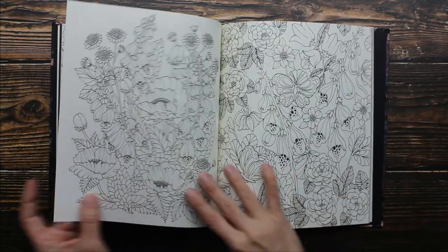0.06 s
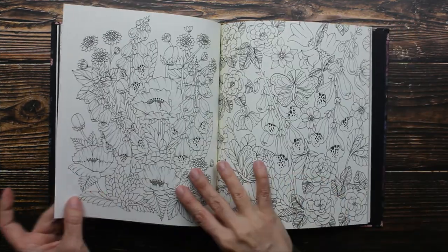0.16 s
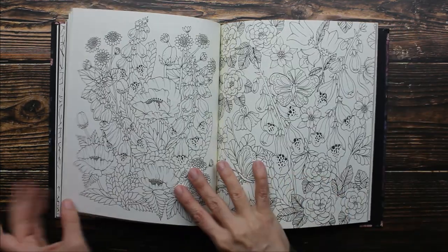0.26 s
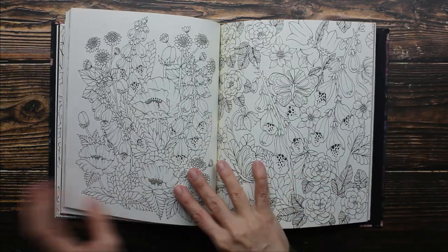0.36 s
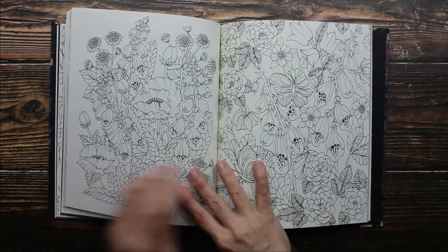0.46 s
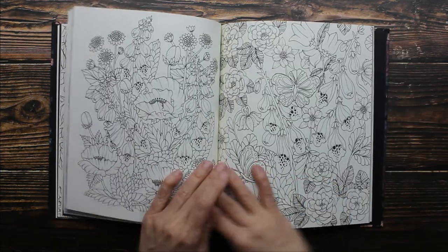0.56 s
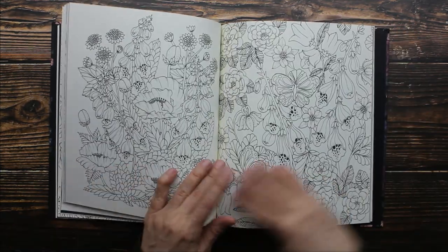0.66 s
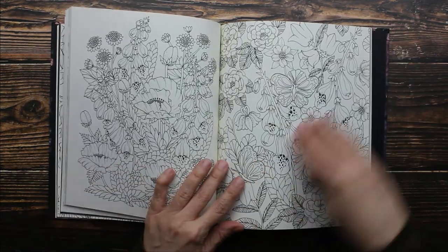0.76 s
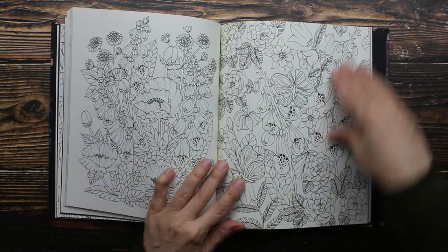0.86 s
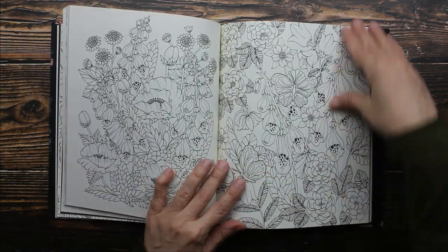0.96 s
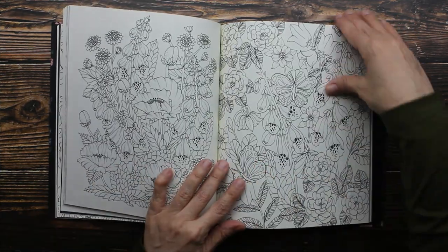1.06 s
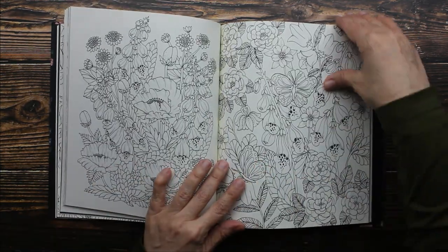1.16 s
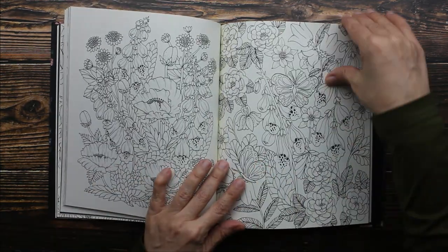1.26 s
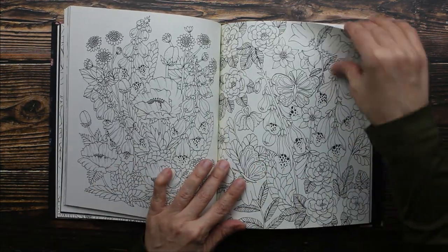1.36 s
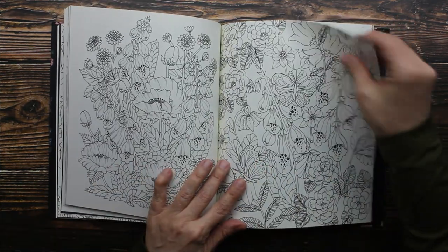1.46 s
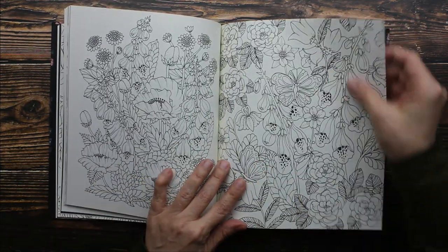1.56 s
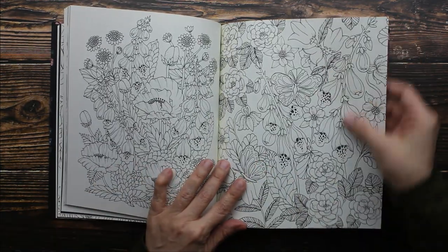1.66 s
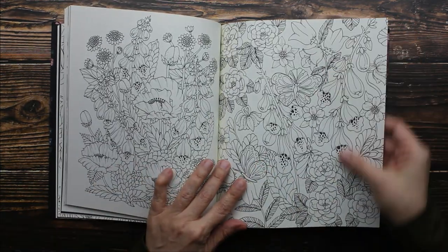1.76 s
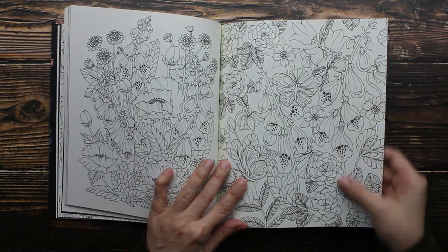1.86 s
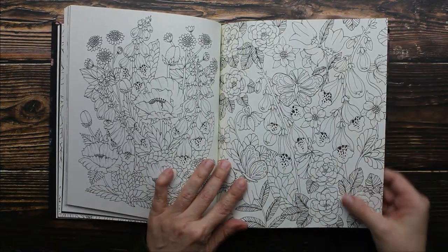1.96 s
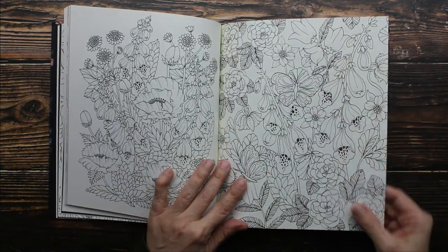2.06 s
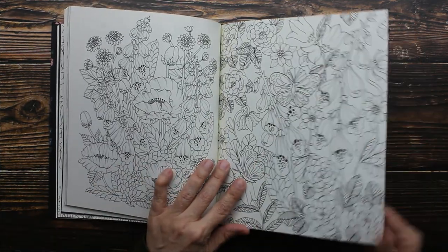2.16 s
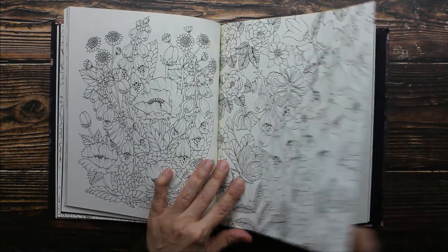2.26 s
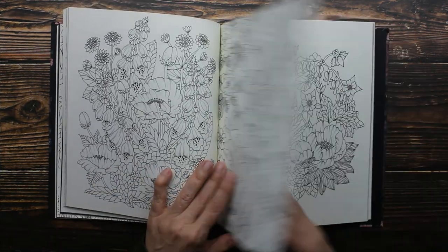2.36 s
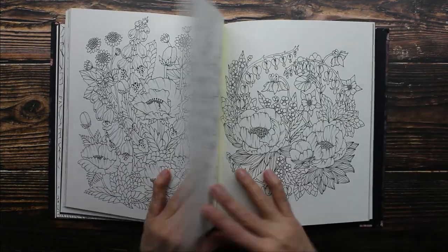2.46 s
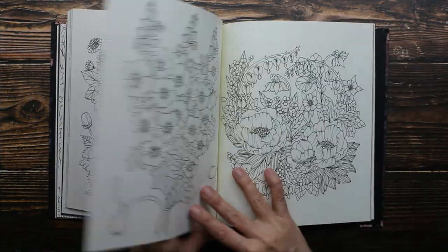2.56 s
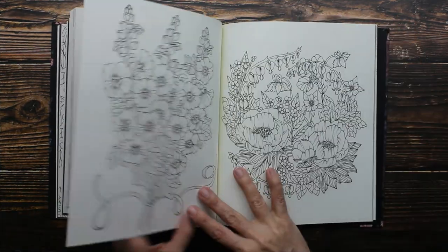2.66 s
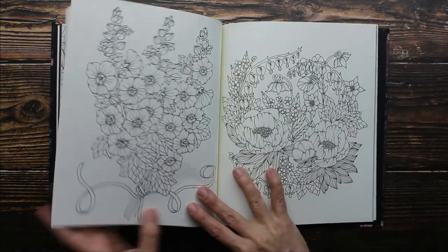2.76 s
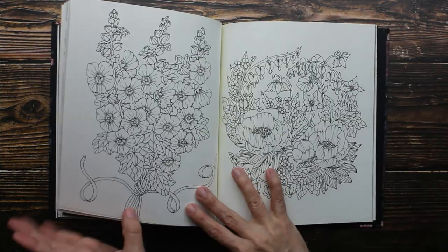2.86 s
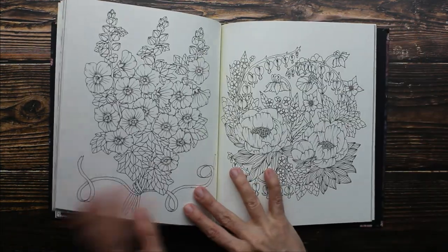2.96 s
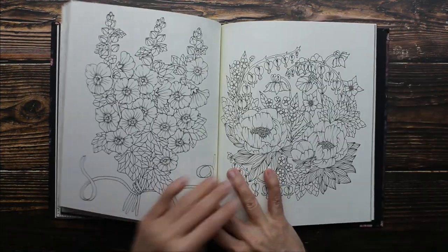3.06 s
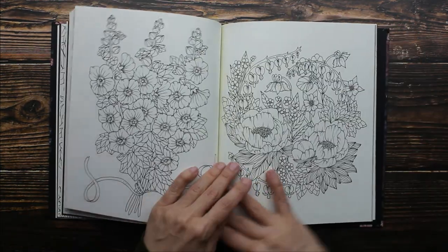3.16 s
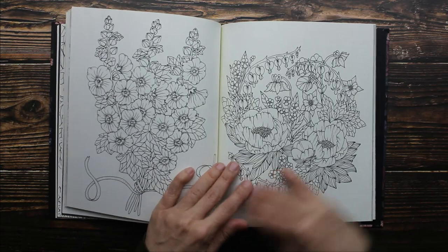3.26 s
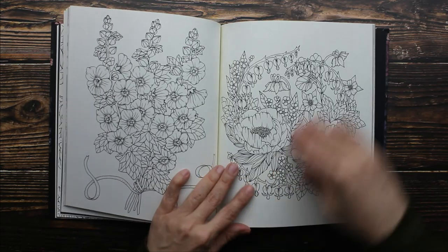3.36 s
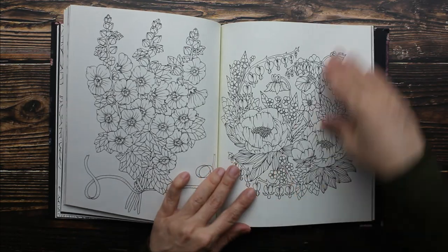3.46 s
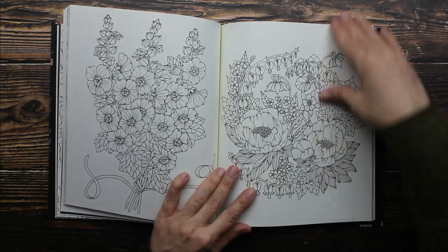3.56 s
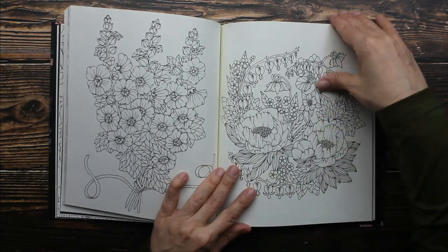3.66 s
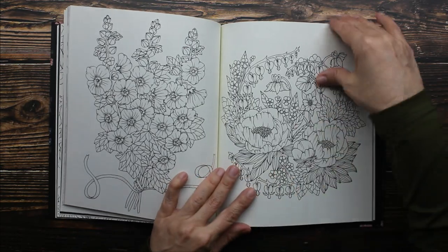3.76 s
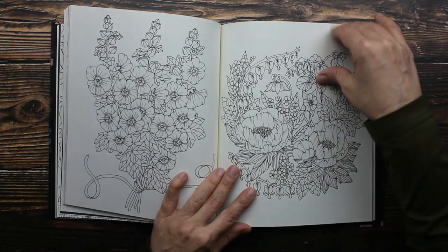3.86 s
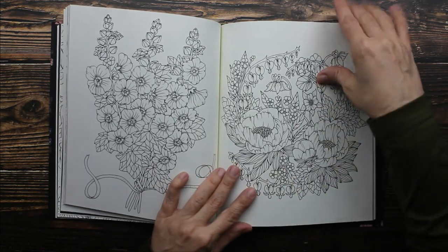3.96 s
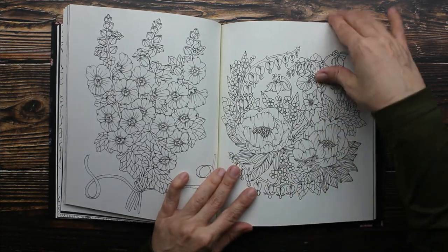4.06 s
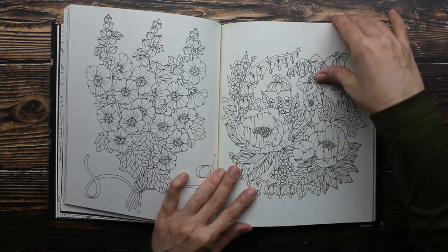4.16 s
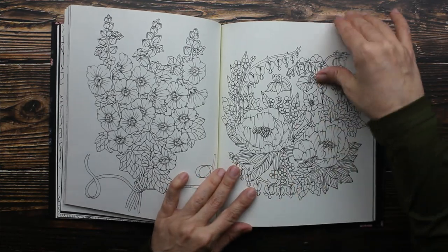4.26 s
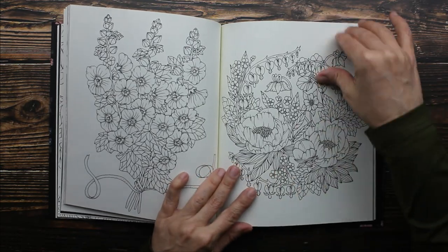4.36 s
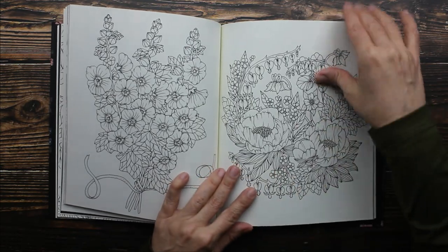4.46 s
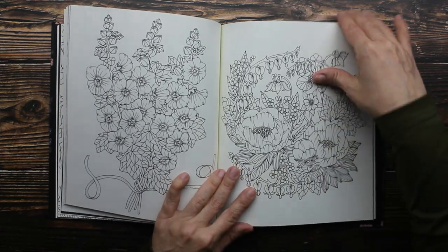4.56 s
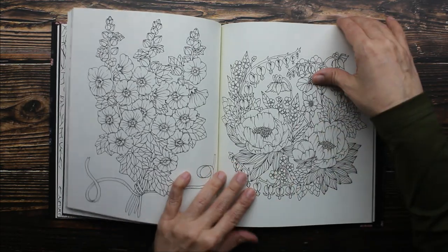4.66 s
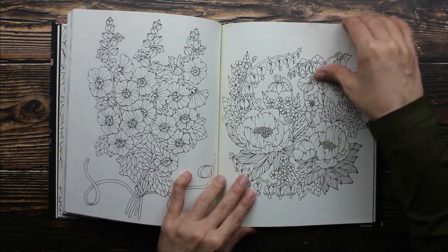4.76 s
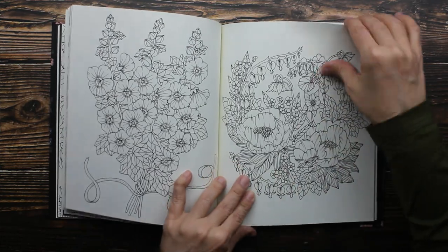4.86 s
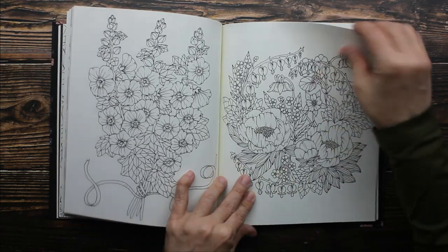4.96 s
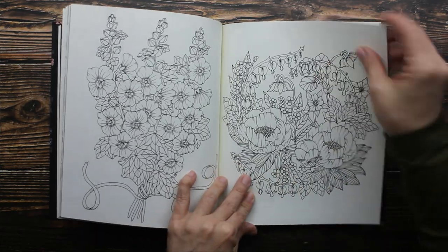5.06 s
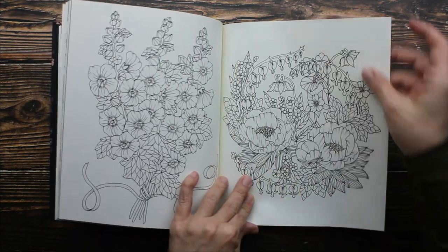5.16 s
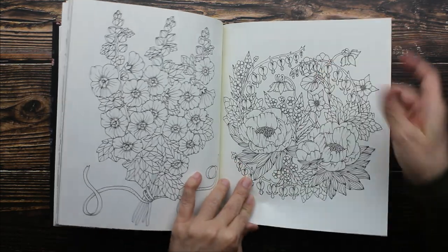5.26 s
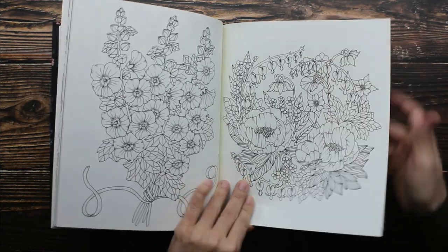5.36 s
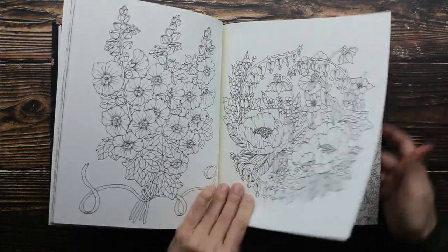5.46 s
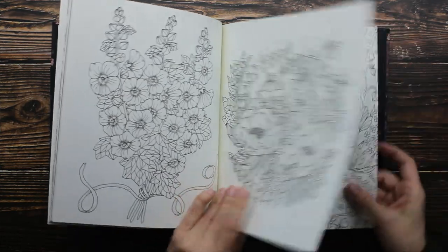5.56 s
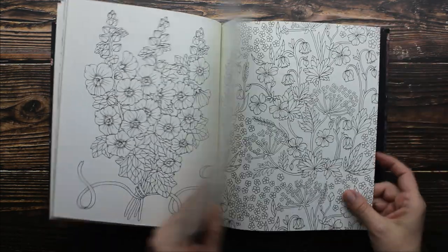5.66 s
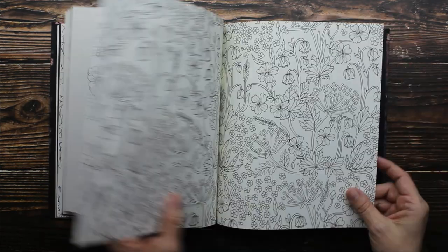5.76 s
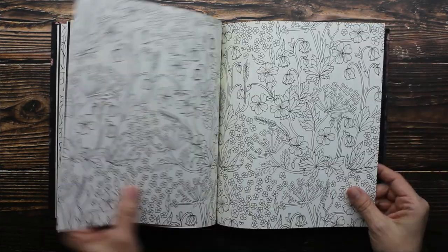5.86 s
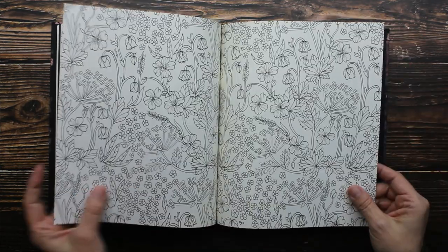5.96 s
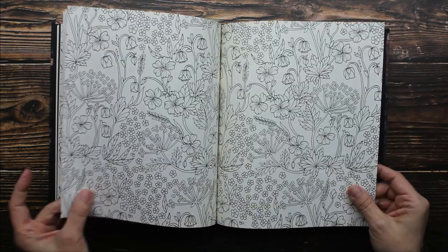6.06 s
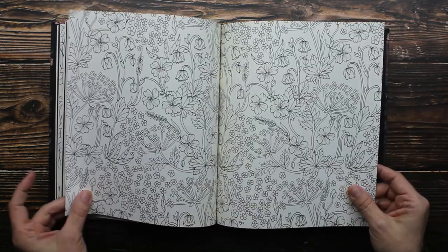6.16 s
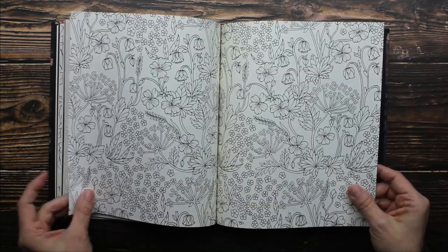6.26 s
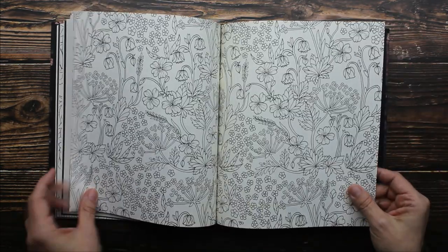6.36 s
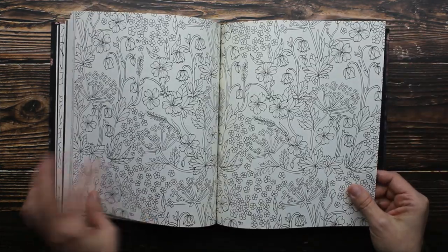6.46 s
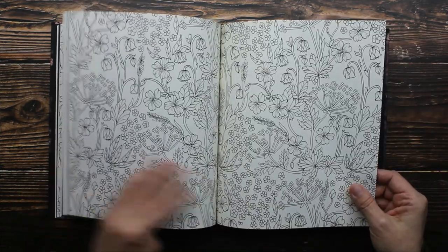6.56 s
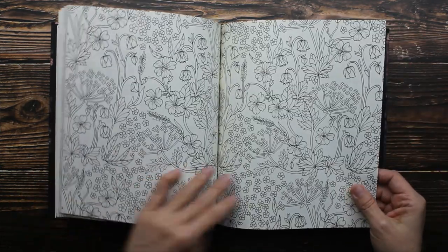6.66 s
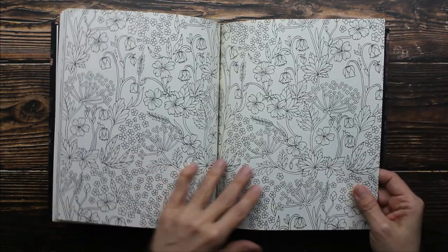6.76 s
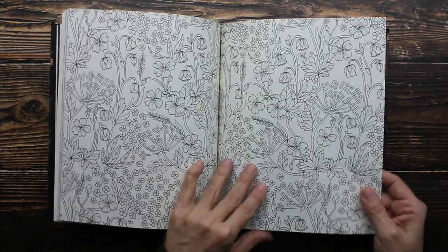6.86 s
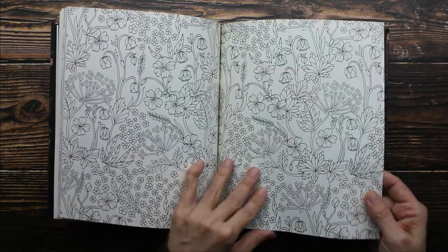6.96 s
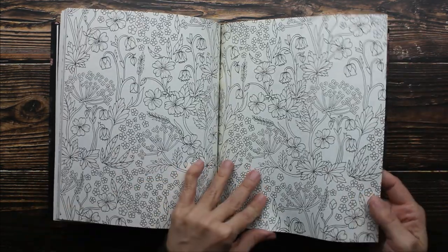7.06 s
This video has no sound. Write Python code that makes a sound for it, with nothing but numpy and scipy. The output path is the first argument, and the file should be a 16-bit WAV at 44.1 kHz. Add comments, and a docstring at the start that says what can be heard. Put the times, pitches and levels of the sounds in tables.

```python
"""Fingers and page edges slide over paper in strokes and pauses throughout: coloured noise in moving bands.
Thick pages of a book on a wooden table are turned by hand in a quiet room. Sheets flex, buckle and snap,
fingertips tap the page and the book knocks dully on the table: damped modes struck by short pushes.
Page edges tick (bursts of grit), taut sheets whistle (gliding narrow noise), a low room hum lies under all.
One microphone."""
import sys
import numpy as np
from scipy import signal
from scipy.io import wavfile

SR = 44100
rng = np.random.default_rng(int(sys.argv[2]) if len(sys.argv) > 2 else 0)


def amplitude_ratio(level_db):
    """Convert a level in decibels to the matching linear amplitude (field) ratio."""
    exponent = np.asarray(level_db, float) / 20
    return 10 ** exponent


def bounce(signal):
    """Save signal as a 16-bit WAV file at the path given by the first command-line argument."""
    frames = np.transpose(np.atleast_2d(signal))
    limited = np.clip(frames, -1, 1)
    pcm = np.round(limited * 32767).astype(np.int16)
    wavfile.write(sys.argv[1], SR, pcm)


N = 313110
STEP = 32  # samples between values of a slow curve
RUN_IN = 8192  # samples for filters to settle, then cut off
BAND_EDGES_HZ = 20 * 2 ** np.arange(0, 9.8, 0.25)
BAND_CENTRES_HZ = np.sqrt(BAND_EDGES_HZ[1:] * BAND_EDGES_HZ[:-1])[:, None]


def rms_one(x):
    """Scale to rms 1."""
    return x / np.sqrt(np.mean(x ** 2) + 1e-20)


def band(x, low_hz, high_hz):
    """Butterworth band-pass."""
    sos = signal.butter(2, [low_hz, min(high_hz, SR * 0.45)], "band", fs=SR, output="sos")
    return signal.sosfilt(sos, x)


def lowpass(x, order, top_hz):
    """Butterworth low-pass."""
    return signal.sosfilt(signal.butter(order, top_hz, fs=SR, output="sos"), x)


def resonance(x, hz, width_hz):
    """Two-pole resonance with gain 1 on top."""
    r = np.exp(-np.pi * width_hz / SR)
    poles = [1, -2 * r * np.cos(2 * np.pi * hz / SR), r * r]
    return signal.lfilter([(1 - r * r) / 2, 0, (r * r - 1) / 2], poles, x)


def ring(x, hz, t60_s):
    """A damped mode driven by x, scaled to peak 1."""
    r = amplitude_ratio(-60 / (t60_s * SR))
    y = signal.lfilter([1, -1], [1, -2 * r * np.cos(2 * np.pi * hz / SR), r * r], x)
    return y / np.abs(y).max()


def step_times():
    """Times in seconds of the slow-curve values."""
    return np.arange(0, N + STEP, STEP) / SR


def in_steps(rows):
    """Columns after the first, interpolated over time in the first."""
    s, *columns = np.transpose(rows)
    return [np.interp(step_times(), s, column) for column in columns]


def drift(rate_hz, count):
    """Rows of slow chance with spread 1, one value every STEP samples."""
    r = np.exp(-2 * np.pi * rate_hz * STEP / SR)
    chance = rng.standard_normal((count, N // STEP + 1002))
    slow = signal.lfilter([1], [1, -2 * r, r * r], chance)[:, 1000:]
    return rms_one(slow)[:, :len(step_times())]


def hump(level_db, centre_hz, widths_octaves):
    """Power per quarter-octave band of a broad resonance; widths below and above its centre."""
    octaves = np.log2(BAND_CENTRES_HZ / centre_hz) + 0 * level_db
    shape = np.exp(-0.5 * (octaves / np.where(octaves < 0, *widths_octaves)) ** 2)
    return amplitude_ratio(level_db) ** 2 * shape / shape.sum(axis=0)


def through_bands(power, drive):
    """Two unrelated drives dealt in turn to the bands, each band at its own moving power."""
    steps = np.arange(N) / STEP
    out = np.zeros(N)
    for k, (low_hz, high_hz) in enumerate(zip(BAND_EDGES_HZ, BAND_EDGES_HZ[1:])):
        gain = np.interp(steps, np.arange(power.shape[1]), np.sqrt(power[k]))
        out += gain * rms_one(band(drive[k % 2], low_hz, high_hz)[RUN_IN:])
    return out


# Air of the quiet room. Each row: frequency in Hz, relative density in dB per Hz.
ROOM_AIR = [(13, -34), (24, -7), (60, 3.5), (110, -9), (300, -12), (700, -19), (1500, -16), (3000, -15.5),
            (6000, -23), (9500, -24), (12500, -33), (15500, -47)]
# Low hum of the house. Each row: frequency in Hz, width in Hz, level in dB rms.
HOUSE_HUM = [(46.3, 9.1, -59), (133.9, 7.8, -71)]


def room_tone(level_db=-55, waver_db=3.0, waver_hz=1.3):
    """Distant air, almost steady, over two narrow hums."""
    hz, db = np.transpose(ROOM_AIR)
    density_db = np.interp(np.log(BAND_CENTRES_HZ), np.log(hz), db, left=-70, right=-90)
    power = BAND_CENTRES_HZ * amplitude_ratio(2 * density_db)
    moving_db = level_db + waver_db * drift(waver_hz, count=len(BAND_CENTRES_HZ))
    power = power / power.sum() * amplitude_ratio(2 * moving_db)
    white = rng.standard_normal((2, N + RUN_IN))
    air = through_bands(power, white)
    hum = np.zeros(N)
    for hz, width_hz, db in HOUSE_HUM:
        tone = resonance(resonance(white[0], hz, width_hz), hz, width_hz)
        hum += amplitude_ratio(db) * rms_one(tone[RUN_IN:])
    return air + hum


def walls(x, t60_s=0.36, echo_db=-19, low_hz=230, dull_hz=5000, gap_s=0.004):
    """The room answers with a short, dull, dying wash."""
    t = np.arange(round(0.4 * SR)) / SR
    wash = band(rng.standard_normal(len(t)), low_hz, dull_hz) * amplitude_ratio(-60 * t / t60_s) * (t > gap_s)
    return amplitude_ratio(echo_db) * signal.fftconvolve(x, wash / np.sqrt(np.sum(wash ** 2)))[:N]


# Dull knocks of book on table. Each row: start in seconds, peak of the lower mode in dB, its frequency in Hz.
TABLE_KNOCKS = [(0.78, -40, 86), (2.318, -51, 151), (2.482, -55, 210), (2.714, -59, 244), (3.15, -38.5, 68),
                (3.459, -52, 204), (4.635, -49, 136), (4.995, -40, 240), (5.874, -58, 237),
                (6.554, -46, 149), (6.609, -38, 140)]


def knocks(contact_s=0.0092, t60_s=0.16, partner_ratio=1.55, partner_db=-6):
    """A soft push sets two low modes of book and table top ringing."""
    size = 16384
    out, t = np.zeros(N + size), np.arange(size) / SR
    force = np.sin(np.pi * np.minimum(t / contact_s, 1)) ** 2
    for s, db, hz in TABLE_KNOCKS:
        at = round(s * SR)
        lower = ring(force, hz, t60_s)
        partner = amplitude_ratio(partner_db) * ring(force, partner_ratio * hz, 0.42 * t60_s)
        out[at:at + size] += amplitude_ratio(db) * (lower + partner)
    return out[:N]


# Page edges flicking free. Each row: start in seconds, nominal peak in dB, centre in Hz.
EDGE_TICKS = [(1.4637, -30, 3100), (3.834, -25.5, 5960), (3.837, -29, 3180), (4.277, -41, 3620),
              (4.285, -27.5, 4860), (4.291, -25.5, 4370), (4.817, -44, 5840), (4.859, -42, 6100),
              (4.866, -26, 3200), (4.8715, -36, 3120), (4.893, -36, 3110), (4.987, -13.5, 5040),
              (4.9933, -20.5, 3230), (5.601, -31, 7300), (6.404, -22.5, 3170), (6.409, -28.5, 6000)]


def ticks(below=0.083, above=2.35, low_hz=490, top_hz=11000, rms_re_peak_db=-7, hold_s=0.0026, t60_s=0.016):
    """A few milliseconds of broad grit that start at once and die fast."""
    size = 4096
    out, t = np.zeros(N + size), np.arange(size) / SR
    fade_db = -60 * np.maximum(t - hold_s, 0) / t60_s
    for s, db, hz in EDGE_TICKS:
        at = round(s * SR)
        grit = band(rng.standard_normal(size), below * hz, above * hz)
        grit = rms_one(band(grit, low_hz, top_hz))
        out[at:at + size] += grit * amplitude_ratio(db + rms_re_peak_db + fade_db)
    return out[:N]


# A taut sheet sliding. Each row: start in seconds, end in seconds, start in Hz, end in Hz,
# level in dB before the swell.
SHEET_WHISTLES = [(1.415, 1.492, 3920, 3930, -35.5), (1.429, 1.51, 7200, 7300, -40),
                  (1.56, 1.747, 2115, 2240, -43.5), (1.74, 1.92, 2420, 2700, -47),
                  (1.8, 2.104, 5400, 5780, -44.5), (2.24, 2.441, 2904, 2950, -47),
                  (2.62, 2.70, 5800, 5750, -41), (4.961, 5.039, 3390, 3300, -40),
                  (5.48, 5.528, 3800, 3830, -43), (5.528, 5.601, 2744, 2690, -45),
                  (5.537, 5.62, 7300, 7300, -42), (5.99, 6.153, 7300, 7700, -34.5),
                  (6.64, 6.718, 2200, 2260, -45), (6.74, 6.921, 1880, 1854, -55),
                  (6.35, 6.4, 6800, 6600, -55), (6.956, 7.09, 1250, 1418, -44.5),
                  (6.983, 7.096, 3090, 4280, -43)]


def whistles(relative_width=0.22):
    """Noise in a narrow band that swells and fades while it glides."""
    out = np.zeros(N + SR)
    for start_s, end_s, start_hz, end_hz, db in SHEET_WHISTLES:
        at, size = round(start_s * SR), round((end_s - start_s) * SR)
        noise = rng.standard_normal((2, 16384))
        slow = lowpass(noise, 2, relative_width * start_hz / 2)[:, -size:]
        phase = 2 * np.pi * np.cumsum(np.linspace(start_hz, end_hz, size)) / SR
        glide = rms_one(slow[0] * np.cos(phase) + slow[1] * np.sin(phase))
        out[at:at + size] += amplitude_ratio(db) * np.sqrt(np.hanning(size)) * glide
    return out[:N]


# Modes of the stack of pages, also driven by sliding(). Each row: frequency in Hz, width in Hz, strength in dB.
BOOK_MODES = [(335, 17, -0.5), (497, 120, 0.5), (625, 54, -1), (827, 6.1, -7), (1142, 130, 2.5),
              (1250, 44, 0), (1506, 9.9, 2), (1825, 24, -7), (2263, 47, -8), (2795, 500, 7.5),
              (3850, 27, -12), (4660, 310, -7), (5900, 23, -12.5), (7260, 50, -17), (8500, 110, -23)]
# Taps, pats and buckles of the page. Each row: start in seconds before the fixed delay,
# body peak in dB before the low-pass, body frequency in Hz, T60 in seconds.
PAGE_SNAPS = [(0.259, -37, 2000, .03), (0.782, -36, 600, 0.035), (1.462, -28, 2000, .035),
              (2.202, -34, 1140, 0.033), (2.712, -35, 313, .06), (2.734, -28.5, 1010, .04),
              (2.746, -33, 318, 0.1), (2.828, -16.5, 1460, 0.024), (2.829, -26, 517, .03),
              (2.836, -23, 1500, 0.018), (2.846, -26, 483, 0.049), (2.851, -19.5, 1570, 0.069),
              (2.858, -25, 990, 0.024), (2.866, -33, 1260, 0.023), (2.874, -28, 1240, 0.021),
              (2.887, -34, 990, 0.036), (3.151, -33.5, 1430, 0.017), (3.153, -34.5, 580, .047),
              (3.836, -33, 1690, .03), (4.285, -29, 2060, 0.031), (4.296, -37.5, 610, .026),
              (4.63, -36, 580, 0.048), (4.761, -39, 626, 0.083), (4.813, -36, 675, .05),
              (4.854, -43, 662, 0.033), (4.866, -22, 660, 0.022), (4.889, -36, 670, 0.024),
              (4.988, -16, 713, 0.026), (5.102, -38, 1870, .058), (5.226, -41, 670, 0.049),
              (5.355, -33.5, 906, 0.069), (5.504, -31, 486, 0.039), (5.514, -29, 870, .024),
              (5.558, -25, 2440, 0.048), (5.564, -29, 550, 0.03), (5.599, -35, 2170, .035),
              (5.614, -36, 485, 0.045), (5.868, -27, 663, .035), (5.875, -24, 1210, .025),
              (5.878, -27, 504, .03), (5.885, -13, 1430, .014), (5.889, -18, 460, 0.04),
              (5.905, -28, 1330, 0.043), (5.901, -31, 510, 0.035), (5.915, -29, 377, 0.046),
              (6.239, -40.5, 2400, .02), (6.404, -25, 1600, 0.029), (6.409, -25.5, 510, 0.011),
              (6.591, -32, 2180, 0.024), (6.939, -25.5, 1270, 0.034), (6.942, -26, 568, .04),
              (6.948, -27, 910, 0.046)]


def snaps(reach_octaves=0.54, spread_db=1.0, modes_db=-2, delay_s=0.0008, puff_db=-12, contact_s=0.0012,
          top_hz=3300):
    """A soft contact rings the patch of page under it and nearby book modes, and squeezes out a puff of air."""
    size = 8192
    out, t = np.zeros(N + size), np.arange(size) / SR
    mode_hz, _, mode_db = np.transpose(BOOK_MODES)
    for s, db, hz, t60_s in PAGE_SNAPS:
        force = np.sin(np.pi * np.minimum(2 * hz * t, 1)) ** 2  # a push half a cycle long
        force = band(force, 0.77 * hz, 1.58 * hz)  # only what the patch can follow

        nearness = np.exp(-0.5 * (np.log2(mode_hz / hz) / reach_octaves) ** 2)
        gains = amplitude_ratio(mode_db + spread_db * rng.standard_normal(len(mode_hz))) * nearness
        modes = sum(g * ring(force, f, t60_s) for f, g in zip(mode_hz, gains) if g > 0.05)
        body = ring(force, hz, t60_s) + amplitude_ratio(modes_db) * modes

        air = band(rng.standard_normal(size), 0.4 * hz, 1.9 * hz)
        air = rms_one(band(air, 0.3 * hz, 2.1 * hz))
        onset = 1 - np.exp(-(t * hz) ** 2)
        fade_db = -60 * np.maximum(t - contact_s, 0) / (1.4 * t60_s)
        puff = air * onset * amplitude_ratio(puff_db + fade_db)

        at = round((s + delay_s) * SR)  # a short fixed delay before each snap
        out[at:at + size] += amplitude_ratio(db) * (body / np.abs(body).max() + puff)
    return lowpass(out[:N], 4, top_hz)


# A sheet bows or flops and loads the table. Each row: time of the top in seconds, rise in seconds,
# fall in seconds, flex level in dB, table level in dB.
SHEET_FLOPS = [(.65, 0.16, 0.13, -58, -58), (.95, 0.05, 0.047, -61, -59), (.81, 0.045, 0.043, -66, -51),
               (1.42, 0.096, 0.21, -47.5, -69), (2.3, 0.3, 0.041, -55, -61),
               (2.49, 0.024, 0.036, -63, -46.5), (2.54, 0.037, 0.25, -50.5, -53.5),
               (2.73, 0.024, 0.085, -39, -48), (2.857, 0.027, 0.042, -33.5, -46.5),
               (3.16, 0.02, 0.1, -61, -46.5), (3.48, 0.057, 0.047, -57, -42.5),
               (4.17, 0.05, 0.037, -64, -49.5), (4.33, 0.055, 0.066, -56, -51),
               (4.65, .06, 0.054, -62, -61), (4.89, 0.093, 0.056, -43, -58), (5.02, 0.025, 0.046, -48, -44),
               (5.42, 0.12, 0.21, -49.5, -60), (5.57, 0.098, .08, -50, -62), (5.73, .02, 0.057, -49, -54),
               (5.885, 0.027, 0.042, -31, -38.5), (6.41, 0.013, 0.041, -64, -42),
               (6.56, 0.024, .06, -47, -45.5), (7.04, 0.19, 0.021, -48, -61)]


def flops(flex_rest_db=-58.5, table_rest_db=-59, flex_wander_db=2.5, table_wander_db=1.5, wander_hz=8.0):
    """Power of flexing and of the table: a wandering rest level, and a swell for every flop."""
    t = step_times()
    rest_db = np.array([[flex_rest_db], [table_rest_db]])
    wander_db = np.array([[flex_wander_db], [table_wander_db]])
    power = amplitude_ratio(2 * (rest_db + wander_db * drift(wander_hz, count=2)))
    for s, rise_s, fall_s, *levels_db in SHEET_FLOPS:
        swell = np.exp(-4 * ((t - s) / np.where(t < s, rise_s, fall_s)) ** 2)
        power = power + amplitude_ratio(levels_db)[:, None] ** 2 * swell
    return power


# Sliding on paper, one list a stroke or pause. Each row: time in seconds, skin hiss in dB, paper-on-paper in dB.
SLIDE_STROKES = [
    [(0.0, -37.5, -37), (0.1, -34, -40), (0.14, -38.5, -44.5), (0.25, -41.5, -46.5), (0.26, -42, -41.5),
     (0.28, -55, -53)],
    [(0.285, -60, -49), (0.327, -72, -69), (0.413, -77, -74), (0.415, -60, -57), (0.467, -72, -62),
     (0.5, -55, -57)],
    [(0.505, -63, -56), (0.559, -46, -44.5), (0.649, -46, -49), (0.697, -40.5, -45.5), (0.983, -42, -48),
     (1.08, -52, -54)],
    [(1.085, -55, -53), (1.129, -61, -62), (1.169, -52, -54), (1.205, -62, -62), (1.309, -52.5, -59),
     (1.36, -55, -50)],
    [(1.365, -47, -43), (1.431, -41, -37.5), (1.439, -33, -35), (1.453, -35, -52), (1.463, -33, -34),
     (1.52, -38.5, -40)],
    [(1.525, -37.5, -40), (1.807, -30.5, -40.5), (1.879, -34.5, -40), (2.071, -41.5, -46),
     (2.101, -47, -46.5), (2.19, -50.5, -49.5)],
    [(2.225, -55, -48.5), (2.347, -43.5, -44.5), (2.479, -45.5, -47.5), (2.535, -43.5, -43),
     (2.555, -46, -48), (2.585, -45, -42)],
    [(2.595, -41, -37), (2.677, -39, -36.5), (2.687, -41.5, -40), (2.773, -39.5, -43), (2.82, -47, -45)],
    [(2.89, -52, -64), (2.908, -66, -59), (3.02, -67, -63), (3.032, -52.5, -52), (3.08, -76, -70),
     (3.09, -59, -61)],
    [(3.095, -55, -51.5), (3.149, -40, -42.5), (3.213, -46.5, -48.5), (3.487, -38.5, -43),
     (3.699, -54, -56), (3.72, -54, -52)],
    [(3.725, -52, -50), (3.757, -48, -45), (3.809, -47.5, -46.5), (3.82, -55, -54)],
    [(3.855, -53, -51), (3.897, -57, -63), (3.917, -74, -76), (3.997, -76, -76), (4.011, -59, -58),
     (4.07, -67, -69)],
    [(4.075, -72, -67), (4.173, -52, -47.5), (4.205, -60, -56), (4.215, -76, -69), (4.263, -79, -72),
     (4.27, -62, -57)],
    [(4.305, -51, -47), (4.369, -72, -72), (4.445, -70, -60.5), (4.529, -55, -59), (4.561, -69, -65),
     (4.59, -62, -49)],
    [(4.595, -53, -53.5), (4.635, -47.5, -45.5), (4.785, -55.5, -53.5), (4.791, -53, -61),
     (4.817, -53, -48), (4.85, -53, -56)],
    [(4.88, -62, -52), (4.89, -56, -50), (4.93, -66, -57), (4.94, -49, -42), (4.964, -45, -38),
     (4.978, -44, -45)],
    [(5.0, -41, -36.5), (5.07, -45.5, -44), (5.252, -46.5, -52), (5.326, -45.5, -45.5), (5.402, -50, -45),
     (5.46, -47.5, -41.5)],
    [(5.465, -47, -39.5), (5.513, -40, -33.5), (5.531, -44, -36), (5.561, -36.5, -36),
     (5.629, -33.5, -33.5), (5.64, -32, -36)],
    [(5.645, -36.5, -38), (5.683, -34.5, -39), (5.785, -33, -35), (5.831, -36, -35), (5.873, -33.5, -34),
     (5.96, -35, -36)],
    [(5.965, -34, -33.5), (5.977, -34.5, -39), (6.009, -34.5, -41), (6.103, -34.5, -42),
     (6.165, -39.5, -44.5), (6.18, -49, -46)],
    [(6.185, -49, -47), (6.231, -77, -68), (6.243, -60, -50), (6.261, -49, -47), (6.349, -46, -50),
     (6.398, -38.5, -45)],
    [(6.42, -49, -48), (6.478, -53, -54), (6.486, -58, -51), (6.525, -50, -50)],
    [(6.53, -48, -41), (6.552, -40.5, -43), (6.694, -42, -44.5), (6.724, -47, -45), (6.774, -41, -40),
     (6.8, -42, -46.5)],
    [(6.805, -43, -42), (6.871, -49, -44), (6.953, -42.5, -41), (6.961, -46.5, -43), (7.061, -44, -39.5),
     (7.1, -45, -43)],
]
# Colour of each stroke. Each row: hiss centre in Hz, sizzle in dB re hiss, scrape centre in Hz,
# scrape in dB re rustle, flex in dB re paper.
STROKE_COLOURS = [(7500, -28, 3960, 0.5, -14), (6800, -10, 3700, -2, -9), (8370, -19, 4740, 2, -10),
                  (7500, -15, 4700, -1, -13), (7300, -26, 4100, 3, -22), (8130, -25, 4730, 0, -21),
                  (7800, -17, 4400, 0.5, -12), (7300, -9, 5100, -1.5, -15.5), (7400, -6, 4700, 3, -6),
                  (8540, -20, 5000, 2.5, -9.5), (8100, -11, 3800, 2.5, -8.5), (7240, -5, 4000, 2, 2),
                  (7300, -10, 3700, 3, -5.5), (7200, -7, 4100, -1, -6), (7600, -14, 4200, 0, -2.5),
                  (6800, -18, 4500, 5, -6.5), (7700, -11, 4700, -1.5, -10), (7060, -20, 4460, 2, -11),
                  (7600, -15, 4840, -0.5, -14.5), (7400, -31, 3800, 2, -16), (7200, -18, 4700, 1.5, -9.5),
                  (7400, -17, 4400, -5, -5), (7930, -24, 4100, -3, -11), (7600, -28, 4300, -3, -11)]


def sliding(grain_db=1.0, grip_db=0.8, grip_hz=16.5, patchy_db=0.9, patchy_hz=21.0, ringing=0.82):
    """Fibres catch and let go: a noisy stream of slips, coloured by the sheet and the fingers."""
    rows = []
    for stroke, colour in zip(SLIDE_STROKES, STROKE_COLOURS):
        rows += [(*point, *colour) for point in stroke]
    hiss_db, paper_db, hiss_hz, sizzle_db, scrape_hz, scrape_re_rustle_db, flex_db = in_steps(rows)
    scrape_share = 1 / (1 + amplitude_ratio(-2 * scrape_re_rustle_db))
    flex_power, table_power = flops()
    flex_hz, flex_octaves = 600, (0.55, 0.99)

    power = hump(hiss_db, hiss_hz, (0.25, 0.28))
    power = power + hump(hiss_db + sizzle_db, 11200, (0.2, 0.22))
    power = power + scrape_share * hump(paper_db, scrape_hz, (0.36, 0.25))
    power = power + (1 - scrape_share) * hump(paper_db, 2265, (0.46, 0.43))  # rustle
    power = power + hump(paper_db + flex_db, flex_hz, flex_octaves)
    power = power + flex_power * hump(0, flex_hz, flex_octaves)
    power = power + table_power * hump(0, 157, (0.4, 0.53))

    # the grip stutters in all bands at once, and each band has patches of its own
    grip = grip_db * drift(grip_hz, count=1)
    patches = patchy_db * drift(patchy_hz, count=len(BAND_CENTRES_HZ))
    power = power * amplitude_ratio(2 * (grip + patches))

    grain = amplitude_ratio(grain_db * rng.exponential(1, N + RUN_IN))
    slips = rng.standard_normal((2, N + RUN_IN)) * grain
    # the slips also set the stack of pages ringing
    stack = sum(amplitude_ratio(db) * resonance(slips, hz, width_hz) for hz, width_hz, db in BOOK_MODES)
    return through_bands(power, slips + ringing * stack)


def scene():
    """Hands and pages in the room, over its hum."""
    hands = sliding() + whistles() + snaps() + ticks() + knocks()
    mono = hands + walls(hands) + room_tone()
    return np.array([mono, mono])


def band_limit(x):
    """A steep low-pass at the top of the band."""
    return signal.sosfilt(signal.butter(12, 16480, fs=SR, output="sos"), x)


def record(dry, droop_hz=12400, top_hz=15900):
    """One microphone on both channels, drooping in the top octave and cut steeply above it."""
    droop = lowpass(dry, 2, droop_hz)
    mix = signal.sosfilt(signal.cheby2(12, 50, top_hz, fs=SR, output="sos"), droop)
    return band_limit(mix)


dry = scene()
out = record(dry)
bounce(out)
```